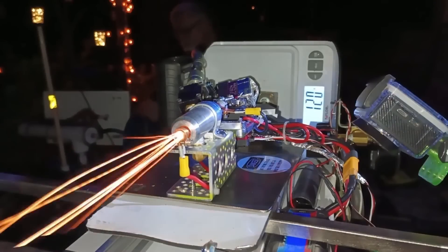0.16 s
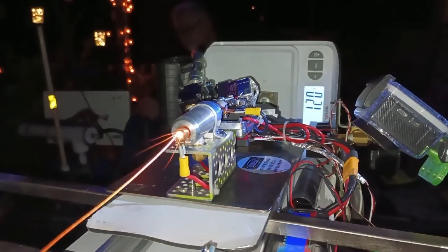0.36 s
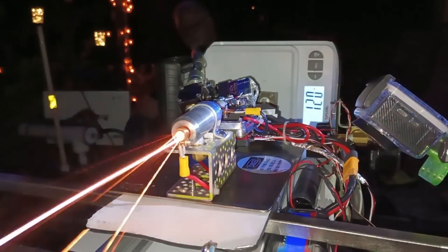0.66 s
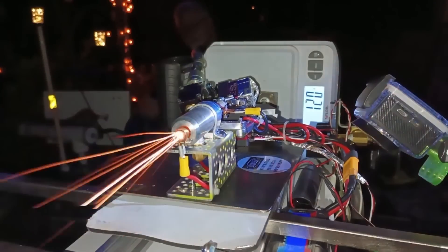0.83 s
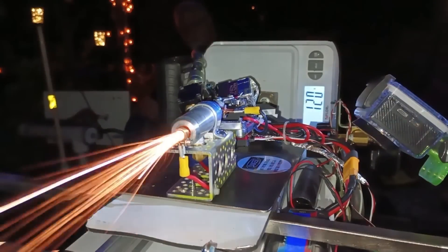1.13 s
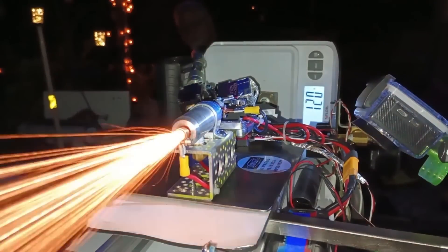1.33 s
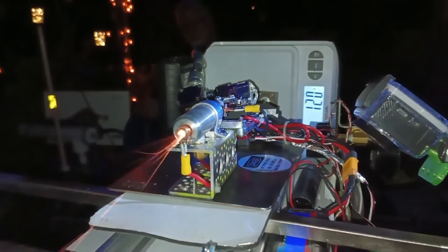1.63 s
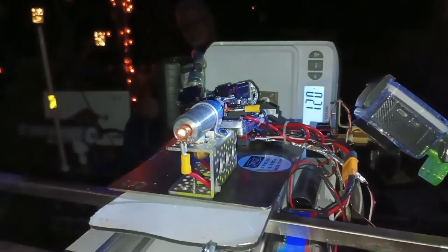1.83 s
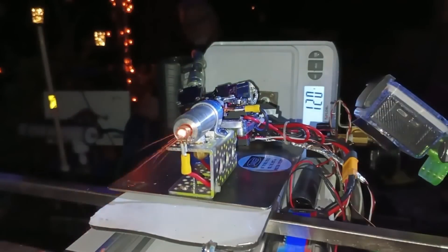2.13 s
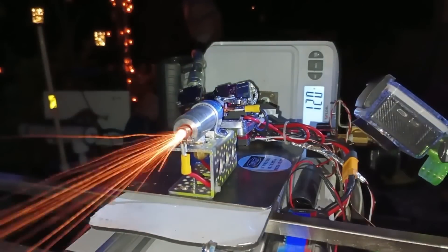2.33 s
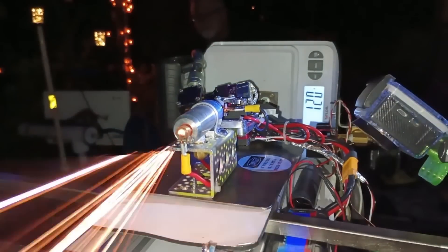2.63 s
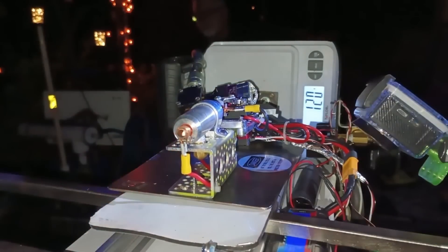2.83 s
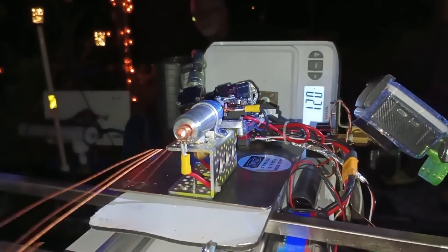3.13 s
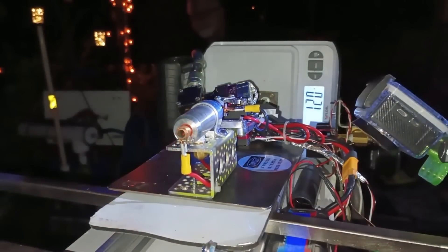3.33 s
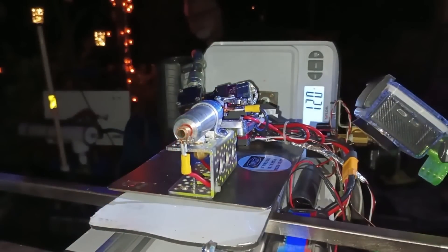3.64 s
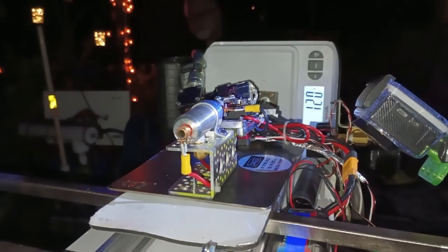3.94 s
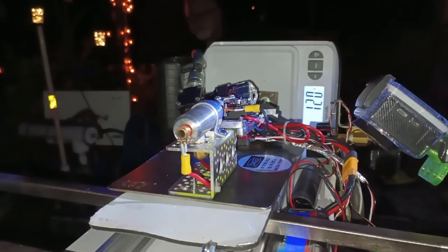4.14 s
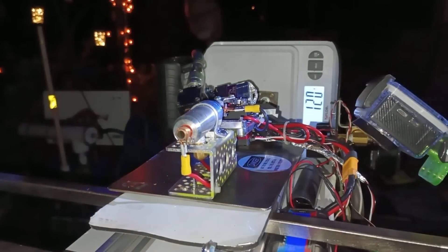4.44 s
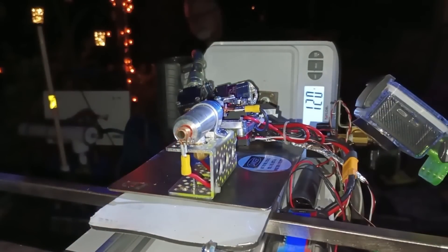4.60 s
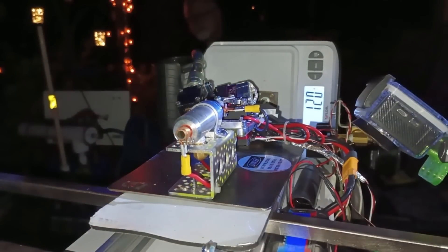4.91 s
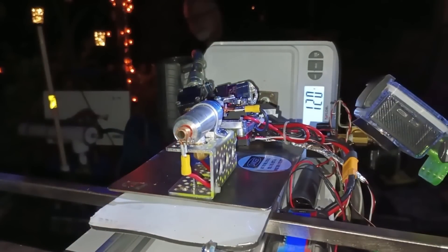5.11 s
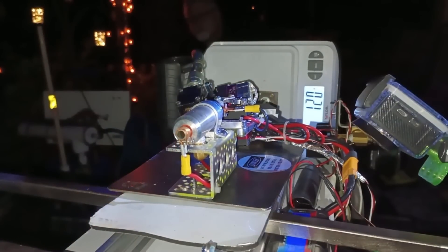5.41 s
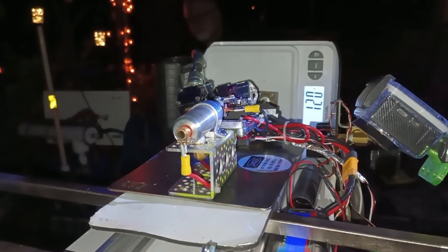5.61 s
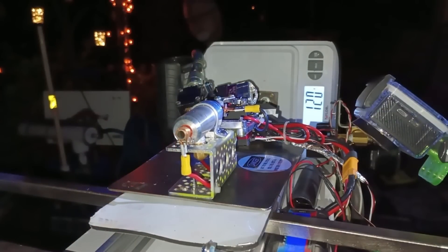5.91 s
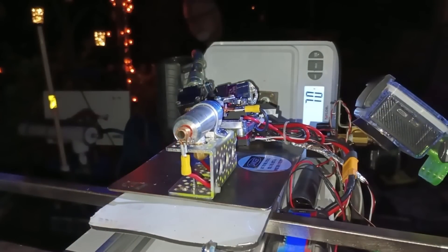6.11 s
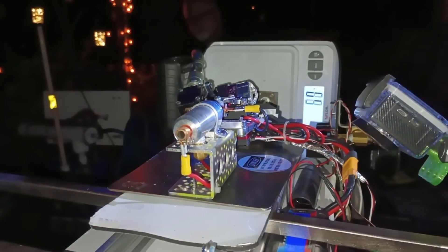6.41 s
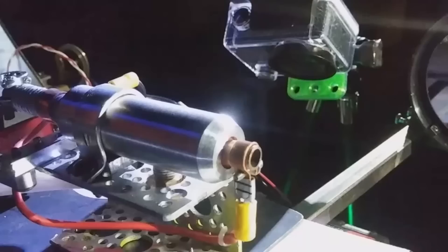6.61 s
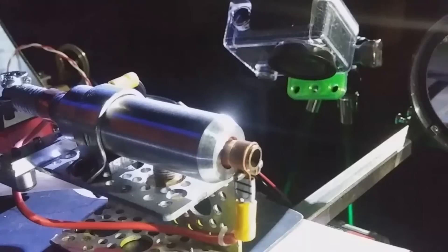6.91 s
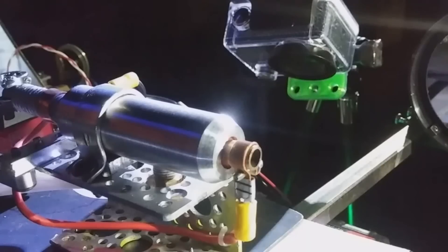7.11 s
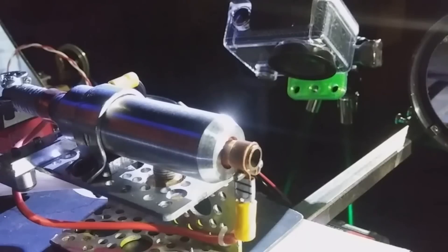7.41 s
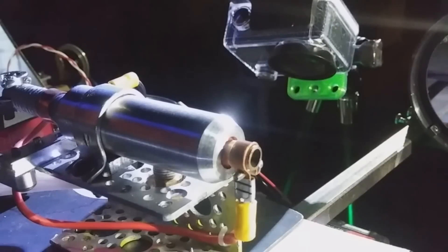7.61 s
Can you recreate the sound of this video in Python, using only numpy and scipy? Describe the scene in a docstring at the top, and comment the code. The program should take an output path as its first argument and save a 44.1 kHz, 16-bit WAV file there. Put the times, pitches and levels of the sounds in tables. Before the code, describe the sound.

A nozzle's airy hiss swells to a loud, rushing blast and stops; a compressor chugs quietly before an abrupt cut to piercing, steady close hiss.

```python
"""An arcjet thruster on a bench: compressed air hisses through its nozzle (noise in bore and chamber modes),
swells to a roar (noise in billowing bands) as sparks fly, then shuts down to a faint leak.
Top hiss, narrow noise bands, gusts and a click add to it; a compressor (shaft harmonics, clatter) chugs behind.
After an abrupt cut the nozzle is heard from very close, in mono: a loud, shrill, steady hiss."""
import sys
import numpy as np
from scipy import signal
from scipy.fft import rfft, irfft, next_fast_len
from scipy.io import wavfile
from scipy.ndimage import uniform_filter1d, map_coordinates

SR = 44100
rng = np.random.default_rng(int(sys.argv[2]) if len(sys.argv) > 2 else 0)


def int16_out(signal):
    """Quantize to a 16-bit WAV file."""
    q = np.round(np.clip(np.atleast_2d(signal).T, -1, 1) * 32767)
    wavfile.write(sys.argv[1], SR, q.astype(np.int16))


N = 341775
TIME = np.arange(N) / SR
PADDED = next_fast_len(N, real=True)
FREQ = np.maximum(np.arange(PADDED // 2 + 1) * SR / PADDED, 1)

# The air valve: trickle to full flow, then down to a leak that ebbs. A curve above 1 starts moves gently.
OPEN_S, SHUT_S, VALVE_CURVE, LEAK_EBB_DB_PER_S = 0.73, 4.43, 2, 4.5
FRONT_END_S, CLOSE_START_S = 6.473, 6.486

# Stereo image of the broadband sounds.
# Each row: frequency in Hz, left minus right in dB, likeness of the ears 0-1, left phase lead in rad.
ROAR_EARS = [(200, 0, 0.02, 0.0016), (900, 1, 0, 0.0024), (6000, 1, 0.03, 0), (7240, -3, 1, 0),
             (9600, -0.5, 0.66, 0), (11600, 1, 0, 0), (15000, 0.5, 0.74, 0)]


def undb(db):
    """Decibels to gain."""
    return 10 ** (np.asarray(db) / 20)


def curve(rows):
    """Second column of a time table, joined by straight lines."""
    rows = np.array(rows)
    return np.interp(TIME, rows[:, 0], rows[:, 1])


def colour(rows, axis=1):
    """One column of a frequency table, joined on a log axis."""
    rows = np.array(rows)
    return np.interp(np.log(FREQ), np.log(rows[:, 0]), rows[:, axis])


def resonances(modes):
    """Gain of steep-sided resonances whose powers add; width is taken at half gain."""
    gains = [undb(db) / (1 + (2 * (FREQ - hz) / width_hz) ** 2) for hz, width_hz, db in modes]
    return np.sqrt(sum(gain ** 2 for gain in gains))


def shaped(x, gain):
    """Filter by a gain per frequency and bring to rms 1."""
    y = irfft(rfft(x, PADDED) * gain, PADDED)[..., :N]
    return y / np.sqrt(np.mean(y ** 2))


def noise(gain):
    """Coloured noise of rms 1."""
    spectrum = rng.standard_normal(2 * len(FREQ)).view(complex)
    y = irfft(spectrum * gain, PADDED)[:N]
    return y / np.sqrt(np.mean(y ** 2))


def wide_noise(gain, ears):
    """Coloured stereo noise with balance, likeness and phase lead by frequency."""
    mid, side = rfft(rng.standard_normal((2, PADDED)))
    sign = np.array([[1], [-1]])
    alike = np.clip(colour(ears, axis=2), 0, 1)
    pair = np.sqrt(1 + alike) * mid + sign * np.sqrt(1 - alike) * side
    balance = undb(sign * colour(ears) / 2) * np.exp(1j * sign * colour(ears, axis=3) / 2)
    balance = balance / np.sqrt(np.mean(abs(balance) ** 2, axis=0))
    y = irfft(pair * gain * balance, PADDED)[:, :N]
    return y / np.std(y)


def walk(rate):
    """Slow chance with rms 1, changing about rate times a second."""
    return noise(1 / (1 + (2 * FREQ / rate) ** 4))


def swell(at_s, length_s):
    """A smooth rise and fall with its top, 1, at at_s."""
    return np.exp(-((TIME - at_s) / length_s) ** 2)


def reflections(echo_db, decay_s=0.0039):
    """Gain of direct sound plus scattered short echoes from bench and apparatus: a rippled spectrum."""
    echoes = rng.standard_normal(N) * np.exp(-TIME / decay_s) * (TIME > .0015)
    return abs(1 + undb(echo_db) * rfft(echoes / np.linalg.norm(echoes), PADDED))


def bend(x, ratio):
    """Read a stereo sound at a moving speed, which scales all its frequencies."""
    place = np.cumsum(ratio)
    return np.array([map_coordinates(ear, [place], order=3, mode="mirror") for ear in x])


def valve_move(at_s, span_s):
    """Progress, 0-1, of one turn of the valve."""
    return 1 - np.exp(-(np.maximum(TIME - at_s, 0) / span_s) ** VALVE_CURVE)


def valve_db(idle_db, firing_db, leak_db, rise_s, fall_s, vent_db=0, vent_s=0.1):
    """Level of one air sound: idle, firing once the valve opens, an ebbing leak as it shuts and the hose vents."""
    running = idle_db + valve_move(OPEN_S, rise_s) * (firing_db - idle_db)
    since = np.maximum(TIME - SHUT_S, 0)
    leaking = leak_db - LEAK_EBB_DB_PER_S * since + vent_db * np.exp(-since / vent_s)
    return running + valve_move(SHUT_S, fall_s) * (leaking - running)


def surge_db(steady_db, lift_db, peak_s, length_s):
    """Firing level: one surge while the sparks fly, settling to a steady flow."""
    return steady_db + lift_db * swell(peak_s, length_s)


def level_shift_db(axis):
    """Short smooth shifts of hiss and roar level, up or down, some of them at shutdown."""
    # Each row: centre in seconds, length in seconds, hiss shift in dB, roar shift in dB.
    level_shifts = [(0.098, .02, 2, 1), (0.269, 0.015, 4, -4), (.42, 0.033, 0.5, -1), (0.654, 0.019, 3, 6),
                    (0.874, .02, 2, -1.5), (1.014, 0.015, -2, 6), (1.533, 0.031, -2, -1),
                    (1.66, .05, 3.5, 0), (1.882, 0.051, -5, 0.5), (2.375, 0.05, 4, 1), (2.456, 0.062, 2, 1),
                    (4.4, 0.0283, 2.5, -4), (4.439, 0.018, 1.5, -5.5)]
    return sum(row[axis] * swell(row[0], row[1]) for row in level_shifts)


def housing_rumble(rumble_db=-71.0, centre_hz=120, width_hz=220):
    """A soft, loose rumble under the compressor's chug: one broad low resonance of noise."""
    gain = resonances([(centre_hz, width_hz, 0)]) * FREQ / (FREQ + centre_hz)
    return wide_noise(gain, ROAR_EARS) * undb(rumble_db)


def compressor(shaft_hz, chug, whine, clatter_colour, chug_db, clatter_db, loose, smear_rad, stroke_s,
               throb=0.086, wander=0.00097, motor_waver_rad=0.38):
    """A piston chugs once a turn, the motor whines, valves clatter on both strokes, partly alike every turn."""
    turns = np.cumsum(shaft_hz * (1 + wander * walk(5.8))) / SR
    turns = turns - np.interp(stroke_s, TIME, turns)  # one stroke falls at stroke_s

    # the tank and the surroundings smear each stroke
    piston = sum(undb(db) * np.cos(2 * np.pi * k * turns + smear_rad * rng.standard_normal())
                 for k, db in chug)
    motor = sum(undb(db) * np.sqrt(2) * np.cos(2 * np.pi * k * turns + motor_waver_rad * walk(21))
                for k, db in whine)

    one_turn = rng.standard_normal((2, int(SR / shaft_hz)))
    rattle = np.array([np.interp(turns % 1, np.linspace(0, 1, len(ear)), ear) for ear in one_turn])
    strokes = 1 + throb * np.cos(2 * np.pi * 2 * turns)
    raw_clatter = (rattle + loose * rng.standard_normal((2, N))) * strokes
    clatter = shaped(raw_clatter, undb(colour(clatter_colour)))

    total = piston / np.std(piston) * undb(chug_db) + motor + clatter * undb(clatter_db)
    return total * undb(0.41 * walk(28))


def click(at_s=5.733, decay_s=0.0036, onset_db=-29):
    """A sharp switch click: a bright snap of noise that dies in a few milliseconds."""
    # Each row: frequency in Hz, relative density in dB per Hz.
    click_colour = [(1000, -25), (3500, -7), (5000, 6), (7500, 0), (11000, -16), (15500, -5)]
    age = TIME - at_s
    decay = (age > 0) * np.exp(-abs(age) / decay_s)
    return wide_noise(undb(colour(click_colour)), ROAR_EARS) * decay * undb(onset_db)


def gusts(right_db=-16, rumble_hz=105, rumble_width_hz=130, buffet_db=5.5, gust_width=0.59):
    """The plume's draught rumbles, mostly on the left microphone; each gust adds a short, low thump."""
    # Each row: centre in seconds, centre frequency in Hz, length in seconds, level in dB.
    gust_rows = [(0.968, 99, 0.014, -26), (1.008, 160, .008, -28), (1.352, 130, 0.02, -22.5),
                 (1.423, 160, 0.025, -16.5), (1.442, 380, 0.0079, -13.5), (1.667, 135, 0.017, -28),
                 (4.44, 104, 0.017, -22)]
    firing_db = surge_db(steady_db=-49.5, lift_db=13.5, peak_s=1.15, length_s=.36)
    draught_db = valve_db(idle_db=-70, firing_db=firing_db, leak_db=-85, rise_s=.18, fall_s=.07)
    rumble_gain = resonances([(rumble_hz, rumble_width_hz, 0)]) * (FREQ / (FREQ + rumble_hz)) ** 2
    out = noise(rumble_gain) * undb(draught_db + buffet_db * walk(25))
    for at_s, hz, length_s, db in gust_rows:
        shape = swell(at_s, length_s)
        thump_gain = resonances([(hz, gust_width * hz, 0)]) * (FREQ / (FREQ + hz)) ** 2
        thump = noise(thump_gain) * shape
        out = out + thump * undb(db) * np.linalg.norm(shape) / np.linalg.norm(thump)
    return np.array([[1], [undb(right_db)]]) * out


def narrow_bands(width_hz=55):
    """Now and then a faint narrow band of noise stands out, often gliding, as it swells and fades."""
    # Each row: centre in seconds, length in seconds, pitch in Hz, glide in Hz per second, level in dB.
    band_rows = [(0.073, .06, 1110, -700, -62), (0.413, .055, 1034, 1200, -57), (.42, .06, 700, 0, -61.5),
                 (0.538, 0.033, 1430, 0, -58), (.58, .05, 540, -400, -61), (.65, .03, 1480, 598, -54),
                 (.69, .06, 1110, 0, -60), (3.62, 0.027, 790, 300, -36), (3.727, .025, 610, 1500, -37),
                 (3.921, .045, 1340, -4500, -38), (4.153, 0.024, 1075, 0, -36),
                 (4.223, .022, 970, -500, -38)]
    grain = walk(width_hz) + 1j * walk(width_hz)
    out = np.zeros(N)
    for at_s, length_s, hz, glide, db in band_rows:
        near = abs(TIME - at_s) < 3 * length_s
        age = TIME[near] - at_s
        band = (grain[near] * np.exp(2j * np.pi * (hz + glide * age / 2) * age)).real
        shape = np.exp(-(age / length_s) ** 2)
        level = undb(db) * np.linalg.norm(shape) / np.linalg.norm(band * shape)
        out[near] += band * shape * level
    return out


def top_hiss():
    """A thin, slightly uneven top hiss."""
    # Each row: frequency in Hz, relative density in dB per Hz.
    top_colour = [(5000, -18), (8000, -2), (9700, -2), (10800, -9.5), (12500, -7), (14000, -16), (15000, 6),
                  (15700, -0.5)]
    unevenness_db = .8 * walk(400) + .9 * walk(22)
    firing_db = surge_db(steady_db=-21.0, lift_db=3.5, peak_s=1.35, length_s=0.29)
    level_db = valve_db(idle_db=-39.0, firing_db=firing_db, leak_db=-54.0, rise_s=0.058, fall_s=0.086)
    return wide_noise(undb(colour(top_colour)), ROAR_EARS) * undb(level_db + unevenness_db)


def warble(x, depth_db, below_hz, glide_rms_hz_per_s=1800, turn_rate=12):
    """Narrow bands come and go in hundredths of a second and slide up and down, mostly under below_hz."""
    hz, at, bands = signal.stft(x, SR, nperseg=1024, noverlap=768)
    chance = rng.standard_normal(bands.shape[1:])
    for _ in range(2):
        chance = uniform_filter1d(uniform_filter1d(chance, size=3, axis=0), size=9, axis=1)
    slide_hz = np.interp(at, TIME, np.cumsum(glide_rms_hz_per_s * walk(turn_rate)) / SR)
    row, frame = np.indices(chance.shape)
    chance = map_coordinates(chance, [row - slide_hz / hz[1], frame], order=1, mode="mirror")
    limited = 2 * np.tanh(chance / np.std(chance) / 2)
    depth = np.interp(at, TIME, depth_db) / (1 + (hz[:, None] / below_hz) ** 2)
    gain = undb(limited * depth)
    gain = gain / np.sqrt(np.mean(gain ** 2, axis=1, keepdims=True))
    return signal.istft(bands * gain, SR, nperseg=1024, noverlap=768)[1][:, :N]


def jet_roar(lowest_billow_rate=20, low_growth=0.35, growth_ref_db=-23,
             bloom_db=5, bloom_s=0.81, bloom_length_s=0.045):
    """Free jet: each eddy size billows alone, large ones slower and growing more with flow; the roar warbles."""
    # Each row: frequency in Hz, relative density in dB per Hz.
    roar_colour = [(25, -36), (50, -42), (80, -6.5), (130, 0), (250, 1), (600, 0), (1500, -1.5),
                   (3500, -2.5), (6800, -2.5), (8200, -34), (9600, -14.5), (11000, -24), (15300, -32)]
    roar = rfft(wide_noise(undb(colour(roar_colour)), ROAR_EARS), PADDED)
    firing_db = surge_db(steady_db=-24, lift_db=9.5, peak_s=1.592, length_s=0.47)
    roar_db = valve_db(idle_db=-47.0, firing_db=firing_db, leak_db=-46.0, rise_s=0.094, fall_s=0.038)
    roar_db = roar_db + level_shift_db(axis=3)
    centres_hz = np.geomspace(150, 4800, 6)
    out = 0
    for hz, share in zip(centres_hz, np.eye(len(centres_hz))):
        band_gain = np.interp(np.log(FREQ), np.log(centres_hz), share)
        band = irfft(roar * band_gain, PADDED)[:, :N]
        bulk = 1 / (1 + (hz / 700) ** 2)  # near 1 for large eddies
        billow_db = (1.22 + bulk) * walk(lowest_billow_rate * np.sqrt(hz / centres_hz[0]))
        # the small eddies bloom first as the valve opens
        early_db = bloom_db * (1 - bulk) ** 3 * swell(bloom_s, bloom_length_s)
        growth_db = bulk * low_growth * (roar_db - growth_ref_db)
        out = out + band * undb(early_db + billow_db + growth_db)
    warble_db = 2.8 * (1 - .7 * swell(1.4, .5))  # shallower in the surge
    return warble(out, warble_db, below_hz=5200) * undb(roar_db)


def chamber_db(idle_db=-44.5, steady_db=-35.5, leak_db=-55, waver_db=2.0):
    """Chamber level: faint at a trickle and at full flow, ringing out for a set while after the valve opens and
    briefly as it shuts."""
    # Each row: start in seconds, end in seconds, fade in seconds, level in dB ahead of the build below.
    chamber_rings = [(0.769, 1.083, 0.036, -21), (4.443, 4.47, 0.014, -31)]
    quiet = undb(valve_db(idle_db, steady_db, leak_db, rise_s=.05, fall_s=0.045))
    rings = 0
    for start_s, end_s, fade_s, db in chamber_rings:
        fade_in = (1 + np.tanh((TIME - start_s) / fade_s)) / 2
        fade_out = (1 - np.tanh((TIME - end_s) / fade_s)) / 2
        rings = rings + undb(db) * fade_in * fade_out
    build_db = valve_db(idle_db=-4.5, firing_db=0.5, leak_db=-2.5, rise_s=0.08, fall_s=.06)
    return 20 * np.log10(quiet + rings * undb(build_db)) + waver_db * walk(45)


def thin_low_modes(bore, trickle_db=-5.5, steady_db=-2, surge_s=1.8, length_s=0.52, under_hz=5750):
    """The bore's lowest resonances are weak at a trickle and are fully driven only in the surge."""
    lowest = irfft(rfft(bore, PADDED) / (1 + (FREQ / under_hz) ** 40), PADDED)[:, :N]
    opened = valve_move(OPEN_S, 0.072)
    thin_db = trickle_db * (1 - opened) + steady_db * opened * (1 - swell(surge_s, length_s))
    return bore + lowest * (undb(thin_db) - 1)


def nozzle_front(sag=0.04, sag_at_s=0.95, sag_s=0.27, drift=0.005, dip_per_db=0.0049, lowest_hz=4850):
    """Air rings bore and chamber; bore pitch sags in the surge and moves against level shifts; the arc flutters."""
    # Each row: frequency in Hz, width in Hz, relative level in dB.
    bore_modes = [(5110, 410, -3), (5560, 670, 0), (6105, 580, 1.5), (6655, 530, -0.5), (7240, 900, -9),
                  (7600, 520, -14), (8550, 390, -15.5), (8900, 390, -20), (13400, 1900, -23),
                  (15400, 920, -18)]
    chamber_modes = [(2850, 920, -7), (3500, 480, -2), (3880, 340, 5), (4260, 340, -2)]
    # Each row: frequency in Hz, left minus right in dB, likeness of the ears 0-1, left phase lead in rad.
    hiss_ears = [(3840, 5.5, 0.62, -2.5), (5100, 16, 0.8, 2), (6320, 12.5, 0.13, -0.5),
                 (6860, 3.5, 0.98, 0), (9000, -12, 0.8, 1), (9800, 0, 0.6, -6), (13000, 8, .6, 0.5),
                 (15200, -3, 0.7, -1)]
    flutter_db = .5 * walk(35) + 0.54 * walk(350)
    bench = reflections(echo_db=-17)
    firing_db = surge_db(steady_db=-20, lift_db=8, peak_s=1.04, length_s=0.49)
    bore_db = valve_db(idle_db=-25.5, firing_db=firing_db, leak_db=-46.5,
                       rise_s=0.1, fall_s=0.083, vent_db=10)
    hiss_shift_db = level_shift_db(axis=2)
    pitch = 1 - sag * swell(sag_at_s, sag_s) + drift * walk(8.02) - dip_per_db * hiss_shift_db
    # the bore carries little under its lowest cross mode
    cut_on = .3 + .7 / (1 + (lowest_hz / np.maximum(FREQ, 1000)) ** 50)
    bore = wide_noise(resonances(bore_modes) * bench * cut_on, hiss_ears)
    bore = bend(thin_low_modes(bore), pitch) * undb(bore_db + hiss_shift_db)
    chamber = wide_noise(resonances(chamber_modes) * bench, hiss_ears) * undb(chamber_db())
    return (bore + chamber) * undb(flutter_db)


def front_view():
    """The whole firing, a little way in front of the nozzle."""
    # Each row: multiple of shaft rate, level in dB (chug relative, whine ahead of the pump gain).
    chug = [(2, -17), (3, -2), (4, -8), (5, -2.5), (6, -3.5), (7, 0.5), (8, -4.5), (9, -4.5), (10, -12),
            (11, -2), (12, -5.5)]
    whine = [(14, -76), (20, -71), (24, -71.5), (25, -73.5), (28, -73), (30, -72), (32, -71.5), (34, -67.5),
             (35, -75.5), (41, -75), (44, -79), (96, -77), (136, -76)]
    # Valve and housing clatter. Each row: frequency in Hz, relative density in dB per Hz.
    clatter_colour = [(120, -28), (300, -4), (480, 4.5), (760, 0), (1000, 1), (1200, -4.5), (1500, -7),
                      (2200, -7), (3800, -5), (6500, -14), (8000, -32), (14000, -37)]
    # Compressor gain. Each row: time in seconds, gain in dB.
    pump_level = [(.8, -7), (4.5, 7), (5.8, 0.5), (6.4, 0.7)]
    pump = compressor(27.85, chug, whine, clatter_colour, chug_db=-56.5, clatter_db=-54.0,
                      loose=1.3, smear_rad=.55, stroke_s=6.345)
    pump = (pump + housing_rumble()) * undb(curve(pump_level))
    return pump + click() + gusts() + narrow_bands() + top_hiss() + jet_roar() + nozzle_front()


def hollow_tone(centre_hz=1080, width_hz=190, tone_db=-38.0):
    """A breathy, hollow resonance under the close hiss that comes and goes."""
    waver_db = 2.5 * walk(14)
    return noise(resonances([(centre_hz, width_hz, 0)])) * undb(tone_db + waver_db)


def close_view(hiss_db=-9.5, roar_db=-25, flutter_db=0.14):
    """Steady air beside the nozzle: sharp bore resonances over the jet and the compressor's strokes."""
    # Each row: frequency in Hz, width in Hz, relative level in dB.
    bore_modes = [(3856, 300, -9.5), (4350, 360, -14), (4580, 400, -19), (5040, 410, -10), (5276, 190, -4),
                  (5670, 250, -6), (5850, 300, -6), (6210, 350, 0), (6520, 330, -3), (6900, 180, -12),
                  (7120, 410, -2.5), (7360, 300, -9), (7600, 290, -4.5), (7760, 280, -6),
                  (10760, 320, -16.5), (11480, 380, -9), (12130, 720, -9.5), (12500, 450, -17.5),
                  (13100, 800, -20), (14000, 900, -22), (15500, 800, -28)]
    # Each row: frequency in Hz, relative density in dB per Hz.
    roar_colour = [(25, -24), (60, -11.5), (300, -6.5), (480, -5.5), (680, 1.5), (880, -2), (1100, 2),
                   (1700, -4.5), (3000, 1), (8500, -3.5), (10000, -6), (15000, -33)]
    clatter_colour = [(250, -15), (370, -3), (650, 1), (880, 0), (1100, 2), (1700, -10), (4000, -10.5),
                      (14000, -32)]
    # Each row: multiple of shaft rate, relative level in dB.
    chug = [(1, -25), (2, -20), (3, -9.5), (4, -12), (5, -12), (6, -4.5), (7, 0.5), (8, -6.5), (9, -3),
            (10, -6.5), (11, -10), (12, -14.5)]
    bench = reflections(echo_db=-19)
    pump = compressor(28.12, chug, [], clatter_colour, chug_db=-40.5, clatter_db=-37.0,
                      loose=0.85, smear_rad=.4, stroke_s=6.811, throb=0.099)
    roar = noise(undb(colour(roar_colour)) * bench) * undb(roar_db)
    hiss = noise(resonances(bore_modes) * bench) * undb(hiss_db + flutter_db * walk(30))
    return pump[0] + hollow_tone() + roar + hiss


def scene():
    """Two viewpoints, with an instant of silence at the cut."""
    return front_view() * (TIME < FRONT_END_S) + close_view() * (TIME >= CLOSE_START_S)


def record(dry, top_hz=15780):
    """The highest peaks are rounded off and everything above top_hz is cut."""
    rounded = dry / (1 + (dry / .86) ** 12) ** (1 / 12)
    low_pass = signal.ellip(12, .2, 70, top_hz, fs=SR, output="sos")
    return signal.sosfilt(low_pass, rounded)


dry = scene()
out = record(dry)
int16_out(out)
```